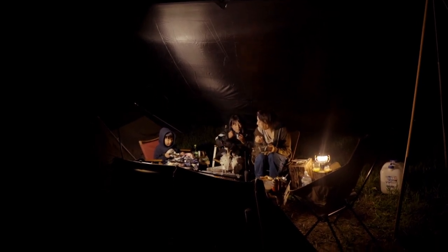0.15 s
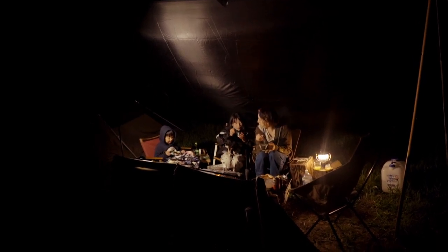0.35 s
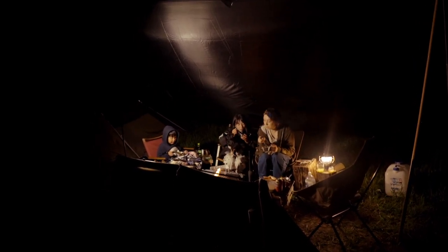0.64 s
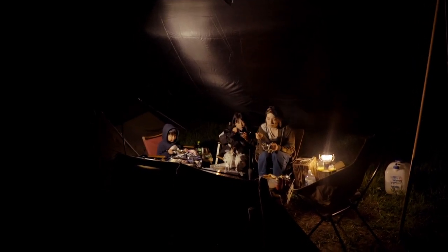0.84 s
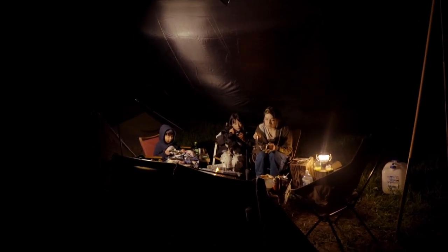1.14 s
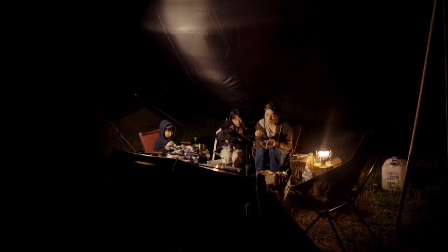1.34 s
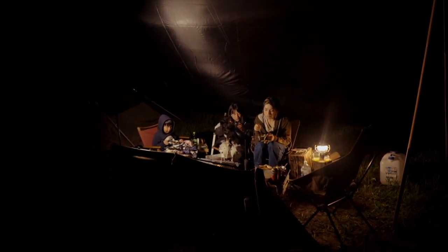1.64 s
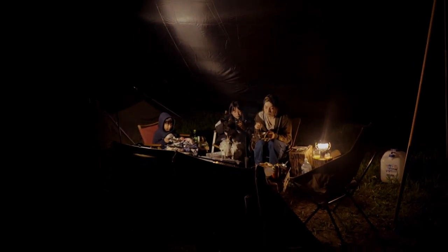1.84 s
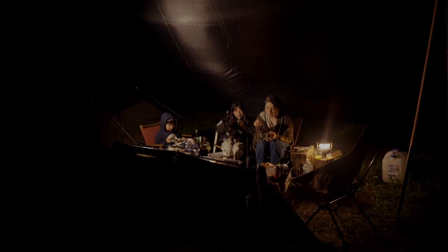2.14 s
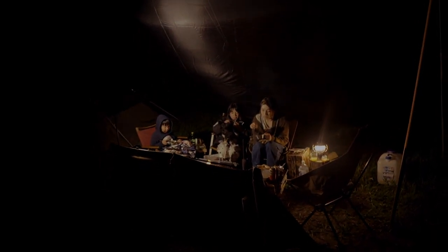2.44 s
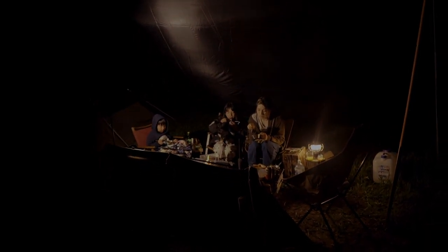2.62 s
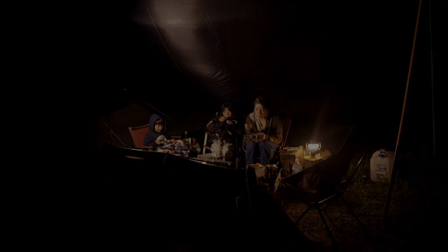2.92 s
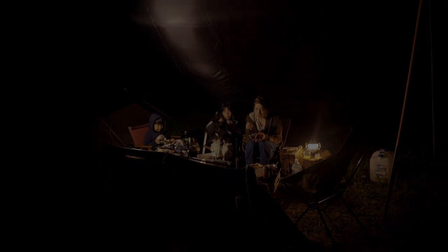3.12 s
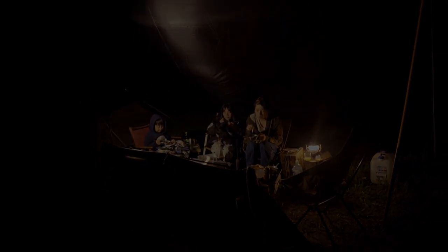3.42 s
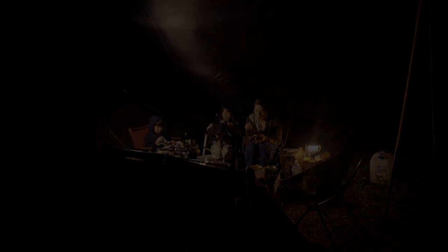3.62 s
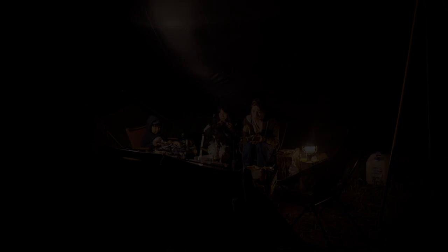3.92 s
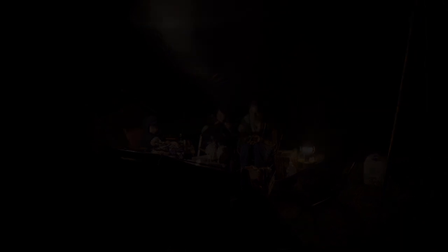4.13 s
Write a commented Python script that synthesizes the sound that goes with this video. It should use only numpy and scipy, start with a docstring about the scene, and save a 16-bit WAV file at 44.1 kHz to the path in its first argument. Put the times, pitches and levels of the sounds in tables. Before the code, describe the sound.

A continuous frog chorus fills the night around a camp. Nearby raspy notes repeat about twice a second, crossing slower, lower rattles, with a crowd of distant frogs behind. The open-air microphone catches lumpy low breeze, tiny crackling and occasional dry snaps, plus muffled bumps up to just past two seconds. The sound then sinks, much quieter but not fully silent at the end.

```python
"""A campsite at night, with a frog chorus. Tree frogs rasp short rising notes near 3 kHz, made of larynx
pulses ringing a vocal sac; pond frogs rattle trains of dry pips near 2 kHz. Many more of both blend in
the distance over a wash of shaped noise. A breeze rumbles on the microphone as slow-gusting low noise,
crackles tick as dying noise bursts, damped resonances knock softly, and the whole sound fades down."""
import sys
import numpy as np
from scipy import signal
from scipy.fft import rfft, irfft
from scipy.io import wavfile
from scipy.ndimage import uniform_filter1d

SR = 44100
rng = np.random.default_rng(int(sys.argv[2]) if len(sys.argv) > 2 else 0)


def wrap_up_sound(samples):
    """Save the sound to the file named by the first command line argument, as 16-bit audio."""
    columns = np.atleast_2d(samples).T
    # keep every value between -1 and 1, then stretch to whole-number steps
    tamed = np.clip(columns, -1, 1)
    steps = np.round(tamed * 32767).astype(np.int16)
    wavfile.write(sys.argv[1], SR, steps)


N = 188329
TIME = np.arange(N) / SR
# Spectrum shared by loud and fine crackles. Each row: frequency in Hz, relative density in dB.
CRACKLE_SPECTRUM = [(500, 10), (2500, 1.5), (5000, 4), (6500, -0.5), (8000, 1.5), (11000, -3.5),
                    (16000, -10)]


def from_db(db):
    """Decibels to amplitude gain."""
    return 10 ** (np.asarray(db) / 20)


def rms_one(x):
    """Scale to unit power."""
    return x / np.sqrt(np.mean(x ** 2) + 1e-20)


def curve(rows):
    """Join (s, value) rows by straight lines."""
    return np.interp(TIME, *np.transpose(rows))


def add(track, start_s, sound):
    """Mix a sound into a track at start_s, cropped to the track."""
    at = int(round(start_s * SR))
    first, last = max(at, 0), min(at + len(sound), N)
    if last > first:
        track[first:last] += sound[first - at:last - at]


def coloured(x, colour):
    """Shape a spectrum along (Hz, dB) rows, silent outside them; white input about keeps its power."""
    hz, db = np.transpose(colour)
    bins_hz = np.maximum(np.arange(N + 1) * SR / (2 * N), 1)
    gain_db = np.interp(np.log(bins_hz), np.log(hz), db, left=-np.inf, right=-np.inf)
    return irfft(rfft(x, 2 * N) * rms_one(from_db(gain_db)))[:N]


def drift(knots_per_s):
    """Slow random wander of unit RMS: straight lines between normal draws."""
    knots = rng.standard_normal(4000)
    return rms_one(np.interp(TIME * knots_per_s, np.arange(len(knots)), knots))


def outdoors(x, t60_s, wet_db):
    """Grass, trees and banks scatter a thin dying tail: convolution with decaying noise."""
    t = TIME[:SR]
    envelope = from_db(-60 * t / t60_s) * (1 - np.exp(-t / 0.0021))
    tail = rng.standard_normal(SR) * envelope
    tail /= np.sqrt(np.sum(tail ** 2))
    return x + from_db(wet_db) * signal.fftconvolve(x, tail)[:N]


def rasp(length_s, hz, pulses_per_s, low_db=-9.5):
    """One tree frog note: larynx pulses ring the vocal sac, whose second harmonic leads; pitch climbs."""
    rise = 0.0995  # share of hz climbed over the note
    pulse_peak_s, jitter, slip_rad = 0.0013, 0.046, 0.54
    shimmer_db, third_db = 1.45, -33
    t = np.arange(int(length_s * SR)) / SR
    gaps, sizes, slips = rng.standard_normal((3, 64))
    starts_s = np.cumsum(np.r_[0, 1 + jitter * gaps[1:]]) / pulses_per_s
    pulse = np.searchsorted(starts_s, t, side="right") - 1
    age = (t - starts_s[pulse]) / pulse_peak_s
    pulses = age ** 2 * np.exp(2 - 2 * age)
    swell = np.sin(np.pi * t / length_s) ** 0.76 * from_db(shimmer_db * sizes[pulse])
    # pi, not 2 pi: the fundamental lies an octave below hz
    phase = np.pi * np.cumsum(hz * (1 + rise * (t / length_s - .5))) / SR
    phase += slip_rad * uniform_filter1d(slips[pulse], size=40)  # slips from pulse to pulse
    voice = np.sin(2 * phase)
    voice += from_db(low_db) * np.sin(phase)
    voice += from_db(third_db) * np.sin(3 * phase)
    return uniform_filter1d(swell * pulses, size=16) * voice


def near_tree_frogs(level_db=0.35, rate_vary=0.049):
    """Three close frogs alternate, each with its own voice; pulse rate varies a little by note."""
    # Notes; frog 0 leads, about every 0.43 s.
    # Each row: middle of the note in seconds, relative level in dB, row of voices.
    notes = [(.05, -31.5, 1), (.215, -32.5, 2), (.32, -31, 0), (.385, -33.5, 1), (.62, -30, 2),
             (.72, -25, 0), (1.02, -27.5, 1), (1.175, -26.5, 0), (1.38, -34, 1), (1.46, -35.5, 2),
             (1.604, -25, 0), (1.731, -31, 1), (1.985, -26.5, 0), (2.15, -32.5, 1), (2.27, -32.5, 1),
             (2.425, -27.5, 0), (2.513, -32, 1), (2.83, -29, 2), (2.905, -28, 0), (3.014, -31.5, 1),
             (3.23, -28.5, 2), (3.321, -27.5, 0), (3.60, -31.5, 1), (3.815, -26.5, 0), (4.251, -25, 0)]
    # Each row: note length in seconds, leading pitch in Hz, mean pulse rate in 1/s.
    voices = [(0.135, 3040, 165), (0.15, 3140, 134), (0.135, 2980, 146)]
    out = np.zeros(N)
    chances = rng.uniform(-1.005, 1, len(notes))
    for (middle_s, db, frog), chance in zip(notes, chances):
        length_s, hz, pulses_per_s = voices[int(round(frog))]
        note = rasp(length_s, hz, pulses_per_s * (1 + rate_vary * chance))
        add(out, middle_s - length_s / 2, from_db(db + level_db) * note)
    return outdoors(out, t60_s=0.28, wet_db=-7)


def far_tree_frogs(count=9, level_db=-44, mid_hz=2980, period_s=.41, length_s=.17):
    """Distant frogs repeat notes in staggered turns, each at its pitch; distance favours the fundamental."""
    out = np.zeros(N)
    pitches = rng.permutation(np.linspace(-1, 1, count))
    pulsings = rng.uniform(-0.988, 1, count)
    for k, (pitch, pulsing) in enumerate(zip(pitches, pulsings)):
        hz = mid_hz * (1 + .07 * pitch)
        pulses_per_s = 145 * (1 + 0.1495 * pulsing)
        for beat in range(-1, 12):
            note = rasp(length_s, hz, pulses_per_s, low_db=-5.0)
            add(out, (beat + k / count + .1 * rng.random()) * period_s, note)
    return from_db(level_db) * rms_one(outdoors(out, t60_s=0.24, wet_db=-6.0))


def night(chorus_db=-42.0, air_db=-47, flicker_db=1.8):
    """The farthest frogs merge into a flickering noise wash over the soft noise of open air."""
    # Spectrum of the merged frogs. Each row: frequency in Hz, relative density in dB.
    chorus_spectrum = [(900, -39), (1150, -10), (1380, -0.5), (1750, -2), (2000, -9.5), (2300, 2),
                       (2580, -2), (2850, 5), (3150, 1.5), (3450, -9), (3800, -14.5)]
    # Spectrum of the open air. Each row: frequency in Hz, relative density in dB.
    air_spectrum = [(30, -13), (200, 2), (400, -0.5), (900, -0.5), (2000, -5.5), (4500, -11), (6500, -17.5),
                    (8000, -19), (11000, -21), (16000, -30)]
    wash = coloured(rng.standard_normal(N), chorus_spectrum)
    wash *= from_db(chorus_db + flicker_db * drift(40))
    air = coloured(rng.standard_normal(N), air_spectrum)
    return wash + from_db(air_db) * air


def breeze(level_db=-1, flutter_db=1.8):
    """Eddies buffet the microphone in uneven lumps: levelled low noise under a gust curve."""
    # Gust strength. Each row: time in seconds, relative level in dB.
    gusts = [(0, -38.5), (.11, -39.5), (.37, -54.5), (.47, -48), (.68, -39.5), (1.3, -37), (1.4, -45.5),
             (1.56, -34), (1.7, -41), (2.18, -32), (2.52, -40), (2.72, -35), (2.81, -51.5), (3.47, -50),
             (3.55, -37.5), (3.76, -48), (3.89, -42), (4.27, -47.5)]
    # Spectrum of the eddies. Each row: frequency in Hz, relative density in dB.
    eddy_spectrum = [(15, -3), (28, 0.5), (50, -3.5), (75, -3.5), (110, -11.5), (160, -18.5), (260, -28.5),
                     (500, -46)]
    eddies = coloured(rng.standard_normal(N), eddy_spectrum)
    steady = eddies / np.sqrt(uniform_filter1d(eddies ** 2, size=5000))
    flutter = flutter_db * np.tanh(drift(21.93))
    return from_db(curve(gusts) + level_db + flutter) * steady


def fine_crackle(level_db=-53.5, per_s_per_band=220, spread_db=3, clump_db=3.5, t60_s=0.02):
    """Hundreds of tiny snaps a second with clumped strength: dying noise bursts, some dull, some bright."""
    out = np.zeros(N)
    clumps_db = clump_db * np.tanh(drift(45))
    for band_hz in [(600, 6000), (4500, 10000), (8000, 16000)]:
        sizes_db = spread_db * np.minimum(rng.exponential(1, N), 2) + clumps_db
        hits = (rng.random(N) < per_s_per_band / SR) * from_db(sizes_db)
        decay = from_db(-60 / (t60_s * SR)) ** 2  # power per sample
        power = signal.lfilter([1], [1, -decay], hits ** 2 + 1e-18)
        bandpass = signal.butter(1, band_hz, "band", fs=SR, output="sos")
        out += signal.sosfilt(bandpass, np.sqrt(power) * rng.standard_normal(N))
    return from_db(level_db) * rms_one(coloured(out, CRACKLE_SPECTRUM))


def pip(hz):
    """One pond frog pip: a few flat-topped cycles that sag slightly in pitch, no two quite alike."""
    mean_sag, length_vary, edge_s = 0.06, 0.13, 0.0014
    stretch, bend, start = rng.uniform(-0.95, 1, 3)
    length_s = 0.00532 * (1 + length_vary * stretch)
    t = np.arange(int(length_s * SR)) / SR
    gate = np.sin(np.pi / 2 * np.clip(np.minimum(t, length_s - t) / edge_s, 0, 1)) ** 2
    pitch_hz = hz * (1 - mean_sag * (1 + bend) * (t / length_s - .5))
    return gate * np.sin(2 * np.pi * np.cumsum(pitch_hz) / SR + np.pi * start)


def far_pond_frogs(count=11, level_db=-43.5, low_hz=1830, high_hz=2380, period_s=.067, swell_db=1.8):
    """Distant pip trains of about fifteen pips a second, each waxing and waning."""
    out = np.zeros(N)
    for hz in np.linspace(low_hz, high_hz, count):
        train = np.zeros(N)
        places = np.cumsum(rng.normal(1, .08, size=80))
        pace = rng.uniform(.88, 1.12)
        lead_s = period_s * (1 + rng.random())
        for start_s in places * period_s * pace - lead_s:
            add(train, start_s, pip(hz))
        out += train * from_db(swell_db * drift(3.08))
    return from_db(level_db) * rms_one(outdoors(out, t60_s=0.55, wet_db=-5.0))


def rattle(length_s, count, slowing, hz, rise_db):
    """A run of pips, strongest toward the middle unless tilted; each gap is 1 + slowing times the last."""
    arch_db = 2.5  # softening of the end pips
    out = np.zeros(N)
    places = np.cumsum(np.r_[0, (1 + slowing) ** np.arange(count - 1)])
    for place in places / places[-1]:
        db = rise_db * (place - .5) - arch_db * (2 * place - 1) ** 2
        add(out, place * length_s, from_db(db) * pip(hz))
    return out


def near_pond_frogs(level_db=-0.6, half_pip_s=0.00273):
    """Interleaved rattles of the closest pond frogs."""
    # Each row: first pip in seconds, last pip in seconds, pip count, share by which each gap grows,
    # pitch in Hz, relative level in dB, rise from first to last pip in dB.
    rattles = [(0.032, 0.1874, 3, .06, 2110, -28.5, 0), (.061, 0.174, 3, .03, 2136, -29.5, -15),
               (0.267, 0.431, 3, 0, 2250, -30, 2), (0.6137, 1.0965, 7, 0.019, 1960, -26.5, -3),
               (0.729, .8868, 3, 0.034, 1910, -28.5, 1), (.7842, 0.963, 3, 0, 2245, -26.5, 0),
               (1.331, 1.468, 3, .02, 1960, -30, 1), (1.5522, 2.003, 8, 0.044, 1945, -23, 2),
               (1.792, 2.109, 5, 0.0021, 2270, -28, -7), (2.354, 2.638, 5, .04, 2230, -28.5, 4),
               (2.549, 2.682, 3, 0, 2330, -29, 9), (2.835, 3.1271, 5, 0.0084, 2236, -30, 2),
               (3.652, 3.885, 4, .07, 2040, -28.5, -3), (3.9406, 4.0701, 3, .08, 2280, -28, -2)]
    out = np.zeros(N)
    for first_s, last_s, pips, slowing, hz, db, rise_db in rattles:
        sound = rattle(last_s - first_s, int(round(pips)), slowing, hz, rise_db)
        add(out, first_s - half_pip_s, from_db(db + level_db) * sound)
    return outdoors(out, t60_s=0.17, wet_db=-6.5)


def neighbouring_pond_frogs(count=14, level_db=-33.0, mid_hz=2120, spread=0.097):
    """Frogs a little farther off take turns with softer five-pip rattles."""
    out = np.zeros(N)
    for k, (when, pitch, pace) in enumerate(rng.uniform(-1, 1, (count, 3))):
        length_s = .3 * (1 + .12 * pace)
        hz = mid_hz * (1 + spread * pitch)
        sound = rattle(length_s, count=5, slowing=.03, hz=hz, rise_db=-2)
        add(out, (k + when / 2) * N / SR / count, from_db(level_db) * sound)
    return outdoors(out, t60_s=0.23, wet_db=-8.0)


def crackles(level_db=-1, t60_s=0.03, attack_s=0.0022, soft_per_s=4, soft_db=-42):
    """Short dry snaps, each a fast-dying noise burst; softer ones fall at random among the loud ones."""
    # Loudest crackles. Each row: time in seconds, relative level in dB.
    loud_snaps = [(0.326, -39), (0.9307, -31.5), (1.161, -38), (1.3058, -38), (1.945, -41), (1.969, -40),
                  (2.09, -37), (2.6848, -37), (2.846, -36), (3.2267, -37), (3.2343, -30), (3.53, -36.5),
                  (3.678, -36)]
    hits = (rng.random(N) < soft_per_s / SR) * from_db(soft_db)
    for hit_s, db in loud_snaps:
        add(hits, hit_s, from_db([db + level_db]))
    decay = from_db(-60 / (t60_s * SR))
    envelope = signal.lfilter([1], [1, -decay], hits + 1e-18)
    envelope = uniform_filter1d(envelope, size=int(attack_s * SR))
    snaps = coloured(envelope * rng.standard_normal(N), CRACKLE_SPECTRUM)
    return outdoors(snaps, t60_s=0.033, wet_db=-6)


def bumps(attack_s=0.0032, t60_cycles=11, overtone_ratio=1.77):
    """Dull knocks: a low resonance and one overtone, damped within a few cycles."""
    # Each row: start in seconds, pitch in Hz, level of the low resonance before damping in dB,
    # overtone in dB re the low resonance.
    knocks = [(.739, 223, -27.5, -1.5), (0.925, 226, -37.5, 3.5), (1.022, 201, -31, -12),
              (1.818, 152, -34.5, -18), (2.078, 102, -24.5, -20), (2.262, 180, -29, -22)]
    out, t = np.zeros(N), TIME[:SR // 4]
    for start_s, hz, db, overtone_db in knocks:
        phase = 2 * np.pi * hz * t
        envelope = from_db(db - 60 * t * hz / t60_cycles) * (1 - np.exp(-t / attack_s))
        tone = np.sin(phase) + from_db(overtone_db) * np.sin(overtone_ratio * phase)
        add(out, start_s, envelope * tone)
    return out


def scene():
    """Near and far frogs, night air, small camp noises and breeze at one microphone."""
    tree_frogs = near_tree_frogs() + far_tree_frogs()
    pond_frogs = near_pond_frogs() + neighbouring_pond_frogs() + far_pond_frogs()
    camp = crackles() + fine_crackle() + bumps()
    return (tree_frogs + pond_frogs + camp + night() + breeze())[None]


def record(dry):
    """Fade the sound down and cut the top with a steep low-pass."""
    # Each row: time in seconds, gain in dB.
    fade = [(0, 1.5), (2.3, 1), (2.75, -3.5), (3.25, -8.5), (3.75, -13), (4.27, -17)]
    cutoff_hz = 15850
    lowpass = signal.ellip(12, .1, 80, cutoff_hz, fs=SR, output="sos")
    return signal.sosfilt(lowpass, dry * from_db(curve(fade)))


dry = scene()
out = record(dry)
wrap_up_sound(out)
```